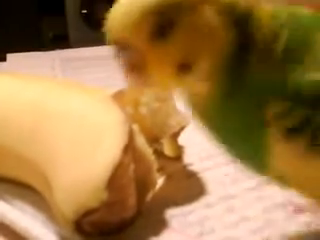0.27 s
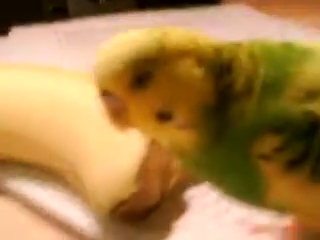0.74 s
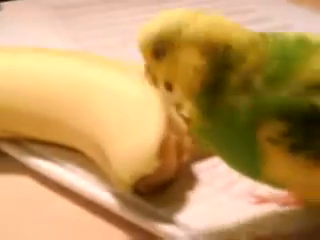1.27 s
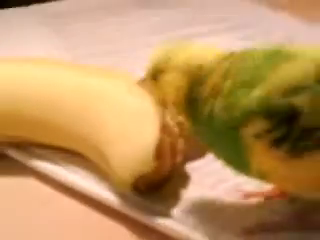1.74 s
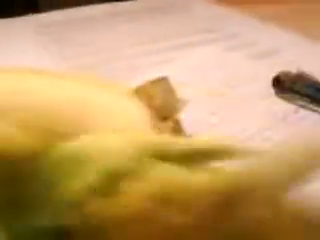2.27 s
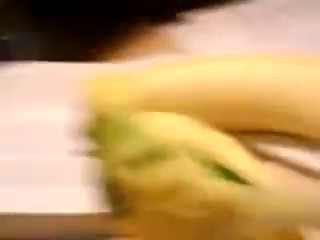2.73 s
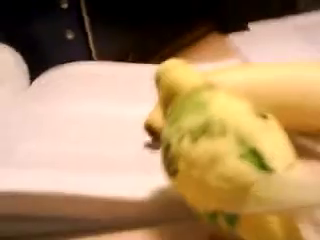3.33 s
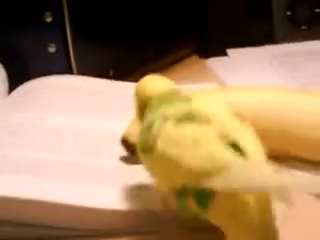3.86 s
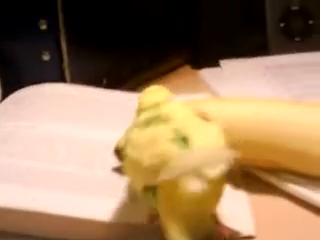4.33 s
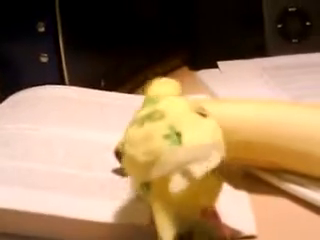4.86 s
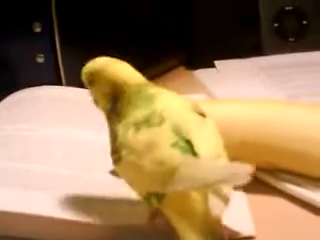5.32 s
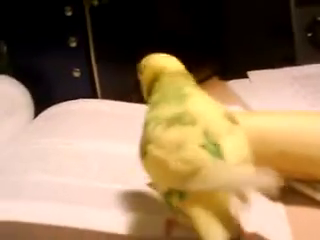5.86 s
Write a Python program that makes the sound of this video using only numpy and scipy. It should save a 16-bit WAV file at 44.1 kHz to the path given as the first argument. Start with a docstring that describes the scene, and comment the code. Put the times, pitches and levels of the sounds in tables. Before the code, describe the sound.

Room hiss, a faint wavering hum and low rumble from a hand on the microphone run through all six seconds. From about 0.2 seconds a small parrot steps over paper on a desk close by, its claws making dry, uneven ticks and scuffs, sharpest between 0.3 and 0.7 seconds and again around 2. Feathers and paper rustle softly, with brief slides near 1.9, 2.8 and 4.2 seconds. Something creaks in dull little pops, densest from 1.4 to 2.3 seconds, with another clear pop near 2.9. Knocks on wood then come from across the room, each with a short echo: two faint ones at about 3.2 and 3.5 seconds, a sharp one at 3.6, and another sharp one at 4.4, just after a light touch. The rustle then drops away, leaving the quiet background and two tiny claw ticks near 6 seconds.

```python
"""Room hiss, hand rumble and a faint hum come first and stay under everything. A small parrot walks over
paper on a desk close to a hand-held camera: feathers and paper rustle, and each claw ticks, scuffs and
rings the desk. Something creaks in dull one-cycle pops while the camera is turned. Then knocks on wood
come from across the room and ring in its walls; a light first touch leads into the last one."""
import sys
import numpy as np
from scipy import signal
from scipy.fft import rfft, irfft
from scipy.io import wavfile
from scipy.ndimage import uniform_filter1d

SR = 44100
rng = np.random.default_rng(int(sys.argv[2]) if len(sys.argv) > 2 else 0)


def materialize(psi):
    """Save the field psi as 16-bit PCM at rate SR to the path in sys.argv[1].

    A 1-D psi becomes a single channel; in a 2-D psi each row is a channel.
    """
    bounded = np.clip(np.atleast_2d(psi).T, -1, 1)
    quanta = np.round(bounded * 32767).astype(np.int16)
    wavfile.write(sys.argv[1], SR, quanta)


N = 269010

# colour of the room hiss: (frequency [Hz], level [dB])
HISS_TONE = [(20, -6), (60, -7.5), (120, -5), (250, -6.5), (500, -11), (1000, -17), (2000, -20.5),
             (4000, -31.5), (6000, -26), (7200, -38.5)]
# rumble of the hand on the camera: (time [s], level [dB])
HAND_RUMBLE = [(0, -58), (.8, -52.5), (1.2, -58), (2.1, -51), (2.6, -57), (3.1, -55), (3.7, -55),
               (4.1, -59), (6.1, -61)]
# bed of feather and paper rustle: (time [s], level [dB])
RUSTLE_BED = [(0, -75), (.17, -80), (.22, -67), (.5, -60), (.7, -58.5), (1.2, -66), (1.45, -55.5),
              (1.75, -61), (2.0, -54), (2.3, -64), (2.45, -61.5), (2.95, -58.5), (3.1, -63), (3.3, -63),
              (3.85, -59), (4.45, -63.5), (4.6, -72), (6.1, -69)]
# colour of the rustle before it brightens: (frequency [Hz], level [dB])
RUSTLE_COLOUR = [(500, -1), (750, 3.5), (950, -7), (1150, -12), (1250, 1.5), (1450, -5.5), (2000, -5),
                 (4000, -9.5), (7000, -21)]
# short slides over the paper: (centre time [s], half length [s], level [dB])
PAPER_SLIDES = [(1.87, 0.024, -51.5), (2.22, 0.028, -60), (2.837, 0.07, -54.5), (4.168, 0.066, -51.5),
                (4.402, 0.01, -48.5)]
# claw ticks on paper, plus a light first touch just before the last knock:
# (time [s], gain [dB], ring pitch [Hz], ring t60 [ms], scuff trim [dB], snap trim [dB], desk trim [dB])
LIGHT_TICKS = [(.192, -45.5, 4330, 5.3, -1.5, -6, 4), (0.2303, -27.5, 1580, 6.8, -8.5, -17, 6.5),
               (0.2722, -39.5, 2210, 5.2, -10, -4, -24), (0.3207, -16.5, 2320, 5.5, -28, -10.5, -8.5),
               (0.3252, -18, 2260, 4.8, -8.5, -13, 3.5), (0.454, -15, 2380, 6.7, -10.5, -14.5, 8),
               (0.49, -39, 5020, 4.7, -6, -17, -5), (0.5446, -11, 2240, 6.5, -12.5, -17, 3.5),
               (.5474, -18.5, 1240, 7.2, -9, -17, -8), (0.614, -43, 2550, 7, -15, -5, -12),
               (0.6537, -24.5, 2160, 3.6, -6.5, -13.5, 5.5), (0.8283, -24.5, 3920, 3, -13, -7, -28),
               (0.9213, -40.5, 1270, 5, -12, -21, 17), (1.4763, -37.5, 1370, 5.7, -4, -21, -11),
               (1.4856, -39.5, 1400, 5.8, -18, -1, -21), (1.506, -41, 1400, 5.2, -3, -11, -11),
               (1.5868, -25, 1320, 8, -8.5, -11.5, -10), (1.674, -34, 2160, 7.3, -7.5, -12.5, 10),
               (1.733, -40, 2150, 6.1, -12, -13, 4), (1.7796, -39, 1500, 5.5, -3, -21, 14),
               (1.8188, -31, 2220, 7.8, -12.5, -9.5, -11), (1.8475, -24.5, 1400, 6.1, -8.5, -7.5, -19),
               (1.981, -20.5, 2150, 5.5, -6, -2.5, -35), (2.0873, -15.5, 2150, 5.7, -9.5, -25, -.6),
               (2.1267, -29.5, 2070, 4.6, -17, -27, 1), (2.144, -22, 1290, 5.9, -7.5, -17, -15),
               (2.1978, -38, 1440, 5.2, -7, -2, 15), (2.2039, -32, 5440, 7, -9, 1.5, -22),
               (2.2135, -28.5, 5130, 6, -6, -6, -16), (2.3205, -42.5, 2300, 8.4, 0, -3.5, -20),
               (2.3263, -40.5, 5330, 4.5, -0.5, 0, -22), (2.348, -35, 1730, 7.9, -9, -18, -22),
               (2.386, -24.5, 1840, 8.8, -6.5, -20, -3), (2.4863, -34, 1810, 4.7, -8, -15, -14),
               (2.575, -27.5, 1870, 10, -10.5, -23, -24), (2.667, -39.5, 1280, 5.7, -4, -22, -4),
               (2.6907, -45.5, 2170, 5.8, -9, -16, -7), (2.7081, -32.5, 1480, 2.6, 0, -16, -15),
               (2.7843, -25, 1930, 7, -7.5, -19, -23), (2.86, -26.5, 1340, 2.7, -5.5, -7.5, -13),
               (3.0298, -30, 1770, 9.3, -7, -23, -11), (3.184, -32, 2010, 6.4, -4, -11, -23),
               (3.245, -42, 1520, 5.6, -11, 4.5, -25), (3.342, -37, 5000, 4.9, -7, -15, -22),
               (3.3552, -18.5, 1340, 2.2, -10, -18, -23), (3.3964, -36.5, 1300, 5.7, -5.5, -16, 1),
               (4.0263, -27, 1510, 10.8, -7.5, -11.5, -25), (4.3086, -41, 2020, 6.7, -4.5, -8.5, -13),
               (4.389, -42, 4300, 14, -6, -12, -20), (4.418, -37, 1900, 13, 5, -16, 0),
               (5.8531, -44.5, 1450, 5.4, 0, -12, 2), (5.9919, -39.5, 1800, 8.9, 0.5, -15, -14)]
# slips of the creak: (time [s], level [dB], pitch [Hz])
CREAK_POPS = [(0.916, -37, 290), (1.239, -36.5, 655), (1.295, -39.5, 352), (1.365, -43, 310),
              (1.394, -35.5, 450), (1.413, -35, 410), (1.426, -43, 477), (1.44, -41, 510),
              (1.448, -41, 554), (1.456, -35.5, 474), (1.465, -43, 605), (1.472, -31.5, 526),
              (1.494, -33, 560), (1.505, -37.5, 444), (1.532, -38.5, 314), (1.587, -17.5, 606),
              (1.593, -32, 470), (1.618, -36, 526), (1.636, -33.5, 494), (1.651, -35, 580),
              (1.677, -28.5, 620), (1.731, -36.5, 418), (1.779, -35.5, 510), (1.819, -32, 570),
              (1.833, -35, 322), (1.847, -23, 580), (1.856, -37, 480), (1.871, -32.5, 510),
              (1.9, -31.5, 575), (1.978, -30, 610), (2.005, -32, 540), (2.03, -31, 610), (2.047, -32, 580),
              (2.068, -33.5, 640), (2.117, -31, 586), (2.142, -24.5, 488), (2.153, -29, 583),
              (2.198, -23.5, 574), (2.216, -31, 640), (2.264, -31, 650), (2.452, -39, 630),
              (2.481, -41.5, 345), (2.668, -40, 324), (2.705, -38.5, 730), (2.86, -19.5, 707),
              (2.928, -36.5, 725), (3.355, -33.5, 324), (3.356, -31, 756), (4.025, -37.5, 330)]
# knocks across the room: (time [s], body level [dB], thump against body [dB], treble against body [dB],
# tail t60 [s], treble roll-off [Hz])
ROOM_KNOCKS = [(3.159, -41, 6.5, -6, 0.38, 4100), (3.511, -46.5, 2, -10, 0.32, 2500),
               (3.6213, -26, -11.5, 0.5, 0.25, 11600), (4.424, -25.5, -12.5, 1.5, 0.23, 12000)]
# early reflections off the walls: (delay [s], gain [dB])
WALL_ECHOES = [(.003, 1.5), (.0085, -1), (0.0115, 1), (0.0155, 6.5), (0.018, 3.5), (0.022, 4.5),
               (0.03, -6.5)]
# low modes of the wood, the deep thump first: (frequency [Hz], width [Hz], gain [dB])
WOOD_MODES = [(124, 27, 0), (323, 35, -9.5), (346, 89, 2.5), (446, 58, -3), (601, 108, 7), (742, 67, -8),
              (885, 45, -9)]
# high rings of the wood: (frequency [Hz], width [Hz], gain [dB])
WOOD_RINGS = [(1160, 39, -14.5), (1590, 33, -0.5), (1865, 59, 6), (2220, 190, 5), (2713, 180, 5.5),
              (3960, 29, -11), (4940, 45, 4), (5100, 85, 5)]
# colour of a knock's crack: (frequency [Hz], level [dB])
CRACK_TONE = [(900, -8), (1150, -9.5), (1600, -4), (2200, -0.5), (2700, -5.5), (3250, -4.5), (3800, -3),
              (4900, -6), (5600, -3.5), (7000, -11)]

HISS_DB, HUM_HZ, HUM_DB = -54.5, 333.7, -62.5
DULL_DB, BRIGHTEN = -50.5, 0.32  # the rustle tilts up by BRIGHTEN dB an octave per dB under DULL_DB
DESK_HZ, DESK_T60_S, SNAP_HZ = 960, 0.0031, 4820
RISE_RATIO, SNAP_RATIO, SCUFF_RATIO = 0.073, 0.6, 4.32  # attack and decays, as multiples of the ring t60
SCUFF_PIVOT_DB, STRETCH_PER_DB = -21.5, 0.023  # softer ticks drag longer, louder ones shorter


def gain_of(db):
    return 10 ** (np.asarray(db) / 20)


def unit_rms(x):
    return x / np.sqrt(np.mean(x ** 2) + 1e-20)


def fader(points):
    """A gain ride through (time [s], level [dB]) points."""
    return gain_of(np.interp(np.arange(N) / SR, *np.transpose(points)))


def add(mix, start_s, sound):
    part = mix[round(start_s * SR):][:len(sound)]
    part += sound[:len(part)]


def highpass(x, hz):
    return signal.sosfilt(signal.butter(2, hz, "high", fs=SR, output="sos"), x)


def coloured(x, points):
    """EQ through (frequency [Hz], level [dB]) points, cut steeply below the first; unit rms out."""
    hz = np.fft.rfftfreq(len(x), 1 / SR) + 1
    point_hz, point_db = np.transpose(points)
    eq_db = np.interp(np.log(hz), np.log(point_hz), point_db)
    low_cut_db = 18 * np.minimum(np.log2(hz / point_hz[0]), 0)
    return unit_rms(irfft(rfft(x) * gain_of(eq_db + low_cut_db), len(x)))


def resonate(x, hz, width):
    """A two-pole resonance."""
    radius, angle = np.exp(-np.pi * width / SR), 2 * np.pi * hz / SR
    return signal.lfilter([1 - radius], [1, -2 * radius * np.cos(angle), radius ** 2], x) * np.sin(angle)


def envelope(t, t60, rise):
    """A rounded attack into an exponential decay."""
    return gain_of(-60 * t / max(t60, .002)) * (1 - np.exp(-t / max(rise, 1e-4))) ** 2


def room_tone():
    """The bed: hiss, lumpy rumble from the hand, and a hum that wavers."""
    hiss, low, waver = rng.standard_normal((3, N))
    rumble = coloured(low, [(24, -5.5), (40, 3.0), (65, -5.5), (110, -11.5), (200, -35.5)])
    t = np.arange(N) / SR
    hum = np.sin(2 * np.pi * HUM_HZ * t) + 0.74 * unit_rms(resonate(waver, HUM_HZ, width=7.1))
    hiss = gain_of(HISS_DB) * coloured(hiss, HISS_TONE)
    return hiss + fader(HAND_RUMBLE) * rumble + gain_of(HUM_DB) * hum


def rustle():
    """Feathers and paper rub in fine, uneven grains that swell on slides; a lighter touch is brighter."""
    grain_db = 1.6 * np.minimum(rng.exponential(1, N // 100 + 1), 4)
    grains = rng.standard_normal(N) * gain_of(grain_db).repeat(100)[:N]
    t = np.arange(N) / SR
    slides = sum(gain_of(db) * np.exp(-((t - centre) / half) ** 2) for centre, half, db in PAPER_SLIDES)
    level = fader(RUSTLE_BED) + slides
    tilt_db = BRIGHTEN * np.maximum(DULL_DB - 20 * np.log10(level), 0)
    dull = coloured(grains, RUSTLE_COLOUR)
    # stacked high shelves, an octave apart
    sheen = sum((gain_of(k * tilt_db) - gain_of((k - 1) * tilt_db)) * highpass(dull, hz)
                for k, hz in enumerate((1200, 2400, 4800), 1))
    return level * (dull + sheen)


def ticks():
    """A claw rings paper and desk, snaps and drags a scuff; the last knock's first touch sounds alike."""
    out, t = np.zeros(N), np.arange(SR // 10) / SR
    desk = np.sin(2 * np.pi * DESK_HZ * t) * envelope(t, DESK_T60_S, rise=0.001)
    for start_s, db, hz, t60_ms, scuff_db, snap_db, desk_db in LIGHT_TICKS:
        scuff_noise, snap_noise = rng.standard_normal((2, len(t)))
        t60 = t60_ms / 1000
        rise = RISE_RATIO * t60
        ring = -np.sin(2 * np.pi * hz * t) * envelope(t, t60, rise)
        stretch = 1 + STRETCH_PER_DB * (SCUFF_PIVOT_DB - db)
        drag = gain_of(scuff_db) * envelope(t, SCUFF_RATIO * t60 * stretch, 1.63 * rise)
        scuff = unit_rms(resonate(resonate(scuff_noise, hz, 2 * hz), hz, 2 * hz)) * drag
        fizz = coloured(snap_noise, [(3300, -5.5), (5000, 1.0), (7000, -4)])
        click = 1.52 * np.sin(2 * np.pi * SNAP_HZ * t) + 1.1 * fizz
        snap = click * envelope(t, SNAP_RATIO * t60, rise=0.00013) + 2.04 * fizz * drag
        tick = 2.02 * ring + scuff + gain_of(snap_db) * snap - 4.7 * gain_of(desk_db) * desk
        add(out, start_s, gain_of(db) * tick)
    return highpass(highpass(out, 650), 650)


def creak():
    """Each slip is a dull pop: one bell-shaped cycle with a weak rebound."""
    out, t = np.zeros(N), np.arange(SR // 50) / SR
    for start_s, db, hz in CREAK_POPS:
        cycles = t * hz - 1.3  # counted from the middle of the pop
        pop = np.cos(2 * np.pi * cycles - .3) * np.exp(-(cycles / 0.69) ** 2)
        after = np.maximum(cycles, 0)
        rebound = 0.091 * np.sin(2 * np.pi * 1.4 * after) * np.exp(-after / 3.8)
        add(out, start_s, gain_of(db) * (pop + rebound))
    return out


def knocks():
    """One blow, its wall echoes and a diffuse tail, shared by every knock, ring the struck wood."""
    out, t = np.zeros(N), np.arange(SR // 2) / SR
    tail, grit = rng.standard_normal((2, len(t)))
    clump_db = 2 * unit_rms(uniform_filter1d(rng.standard_normal(len(t)), size=130))
    tail = unit_rms(tail * gain_of(clump_db))  # the tail arrives in clumps
    arrivals = np.zeros(len(t))
    arrivals[44] = -.5  # the direct blow, 1 ms in
    for delay_s, db in WALL_ECHOES:
        arrivals[round(delay_s * SR)] = gain_of(db)
    burst = grit * signal.oaconvolve(abs(arrivals), envelope(t[:600], t60=0.0056, rise=0.00027))[:len(t)]
    bass_arrivals = arrivals * gain_of(-600 * t)  # late echoes carry little bass
    for start_s, db, thump_db, treble_db, t60, rolloff_hz in ROOM_KNOCKS:
        drive = bass_arrivals + 0.04 * tail * envelope(t, t60, rise=0.00069)
        lowest, *modes = (gain_of(mode_db) * resonate(drive, hz, width) / width
                          for hz, width, mode_db in WOOD_MODES)
        body = highpass(sum(modes), 200)
        thump = highpass(lowest, 75) * envelope(t, .95 * t60, rise=.004)
        crack = 0.97 * burst + tail * envelope(t, t60, rise=0.0014)
        rings = sum(gain_of(ring_db) * resonate(crack, hz, width) / np.sqrt(width)
                    for hz, width, ring_db in WOOD_RINGS)
        treble = coloured(crack, CRACK_TONE) + .7 * unit_rms(rings)
        treble *= 1 - np.exp(-t / 0.0018)  # soften the attack
        treble = signal.lfilter(*signal.butter(2, rolloff_hz, fs=SR), treble)
        for trim_db, layer in [(0, body), (thump_db, thump), (treble_db, treble)]:
            attack_rms = layer[:SR // 25].std()
            add(out, start_s, gain_of(db + trim_db) * layer / attack_rms)
    return out


def scene():
    """The hits over the beds, in one mono mix."""
    return (ticks() + creak() + knocks() + rustle() + room_tone())[None]


def record(dry):
    """The camera cuts off the top end and adds the faint noise of its converter."""
    lowpass = signal.firwin(301, cutoff=7100, window=("kaiser", 9), fs=SR)[None]
    return signal.oaconvolve(dry, lowpass, "same") + gain_of(-104) * rng.standard_normal(dry.shape)


dry = scene()
out = record(dry)
materialize(out)
```